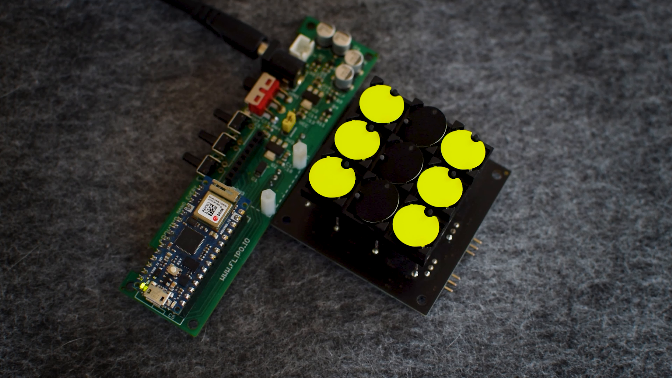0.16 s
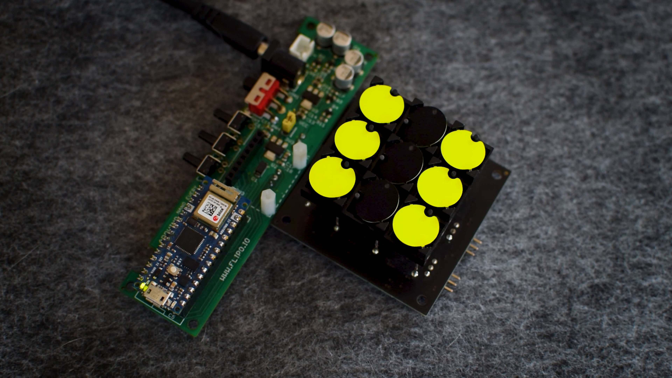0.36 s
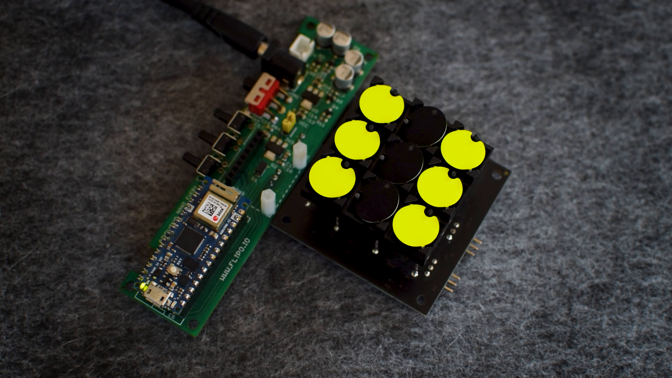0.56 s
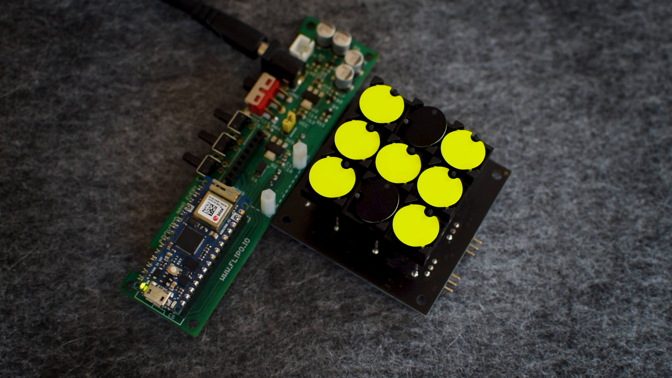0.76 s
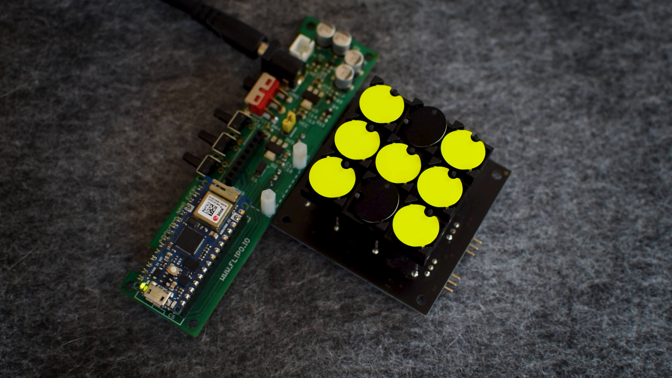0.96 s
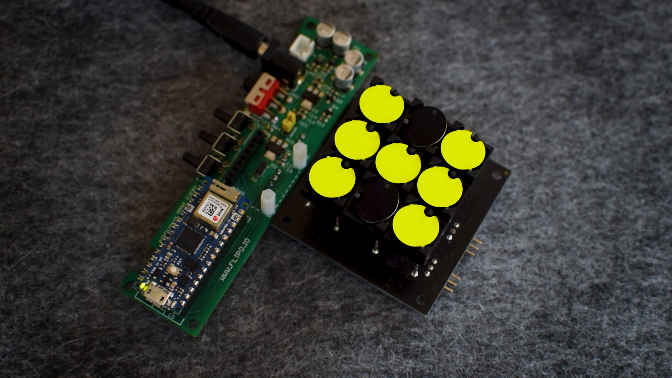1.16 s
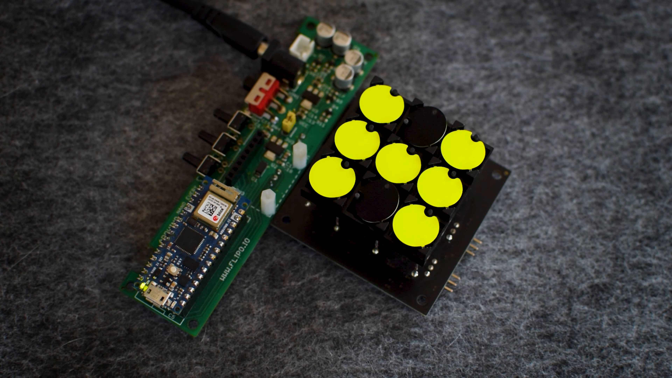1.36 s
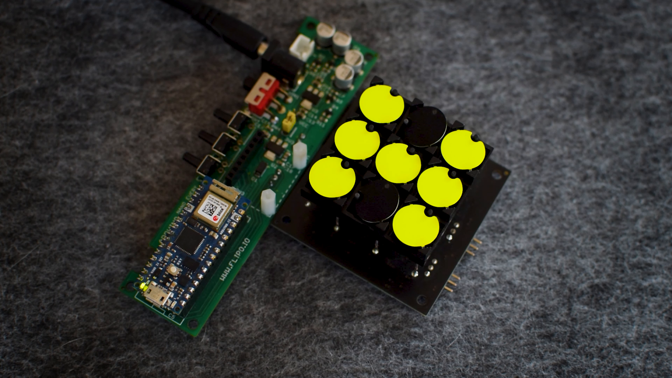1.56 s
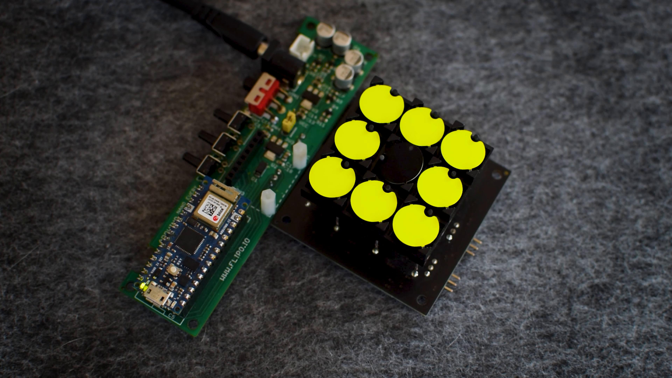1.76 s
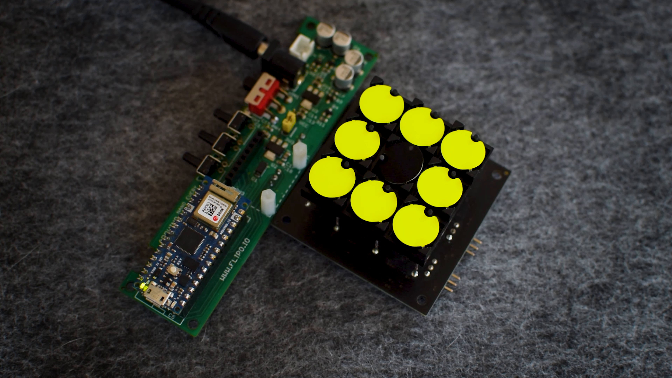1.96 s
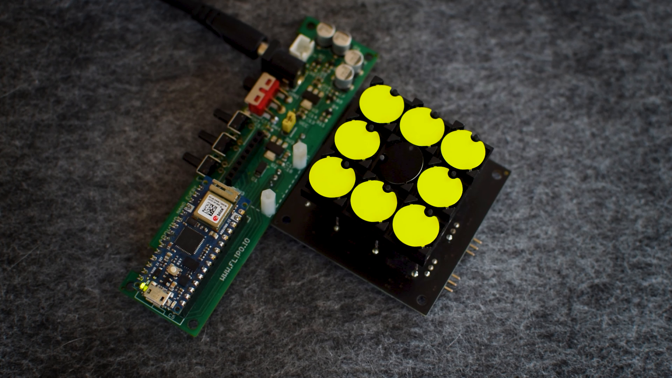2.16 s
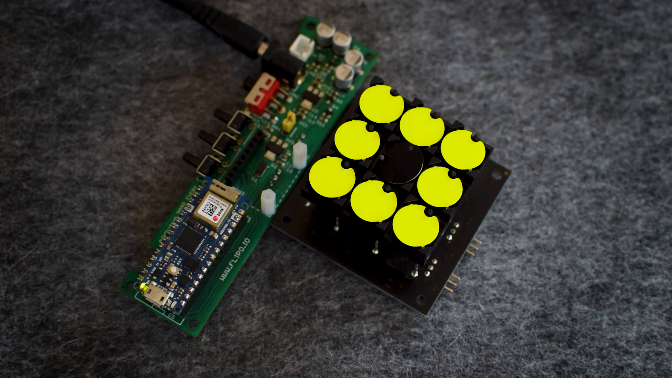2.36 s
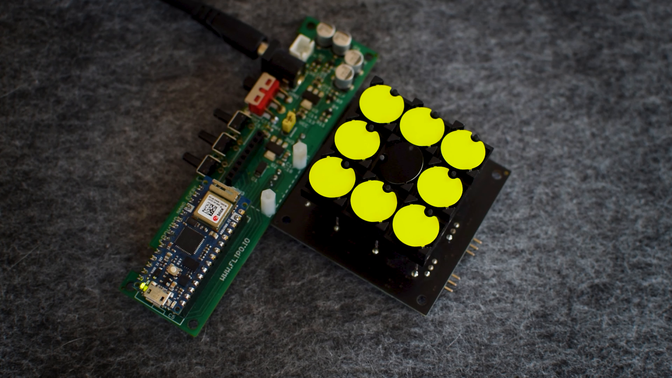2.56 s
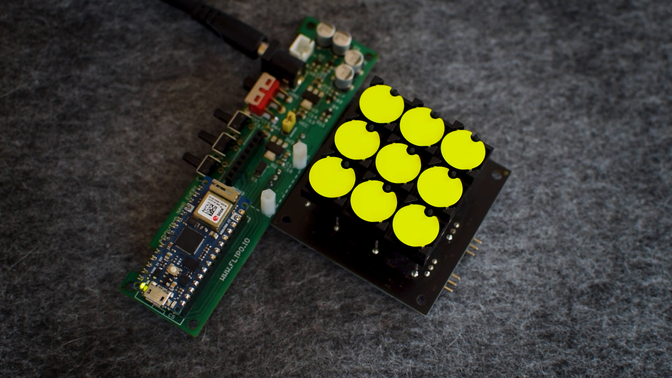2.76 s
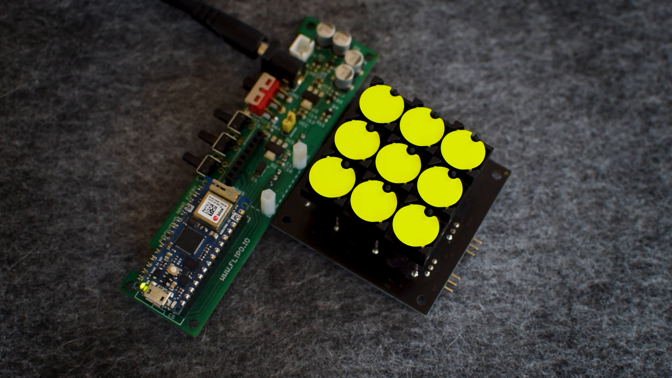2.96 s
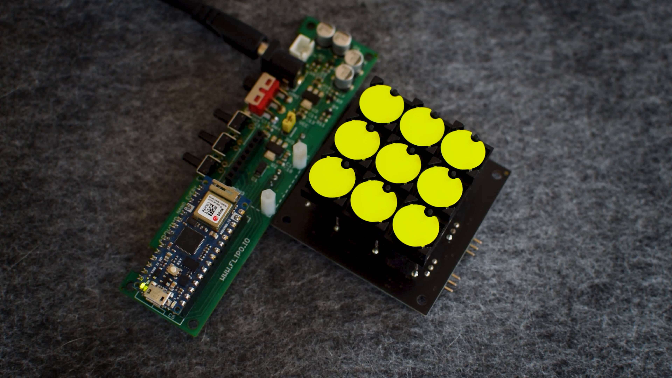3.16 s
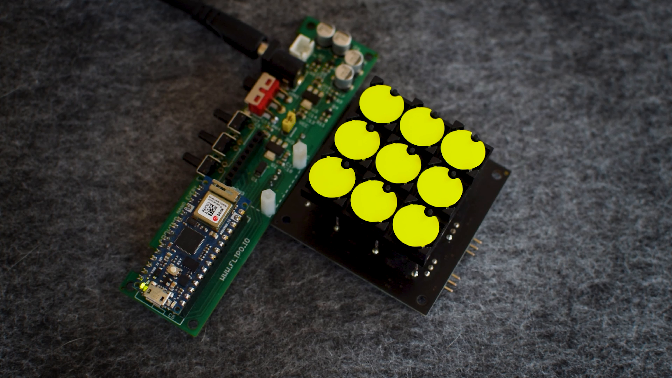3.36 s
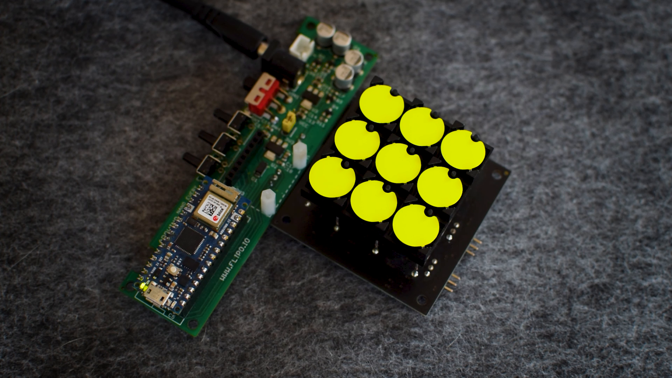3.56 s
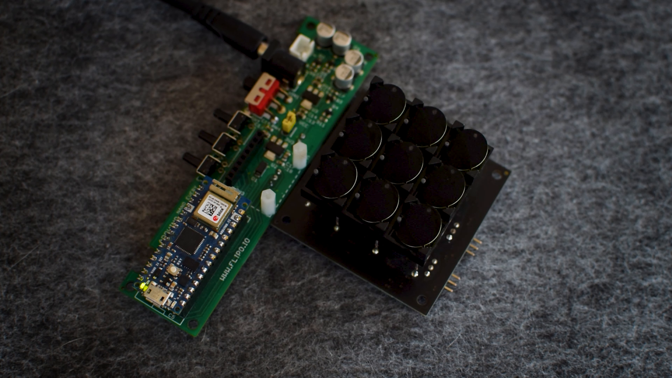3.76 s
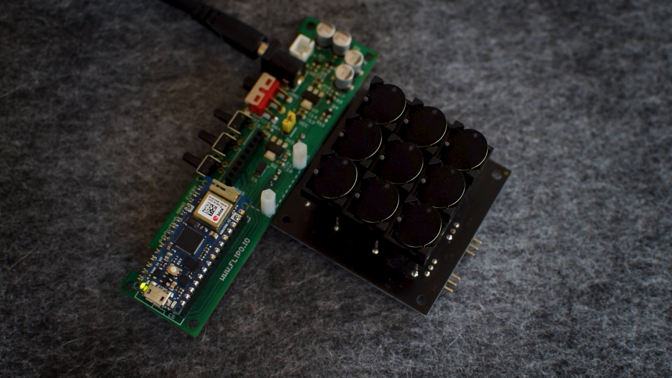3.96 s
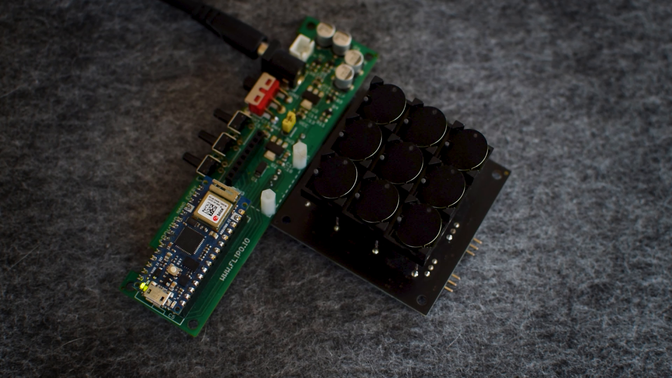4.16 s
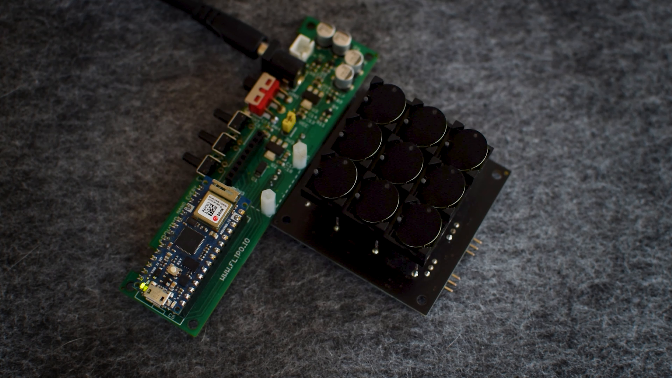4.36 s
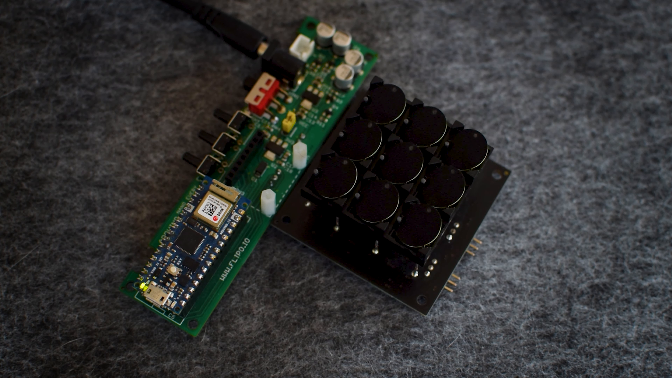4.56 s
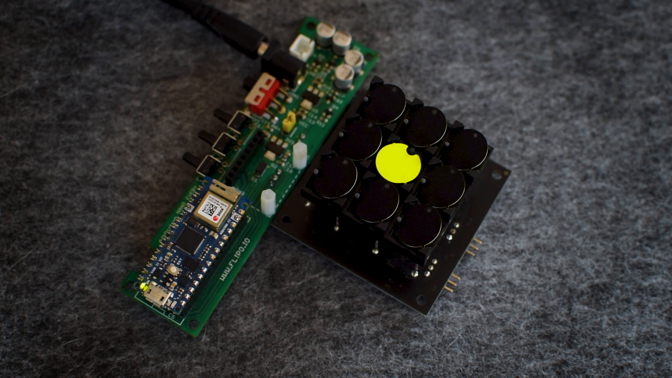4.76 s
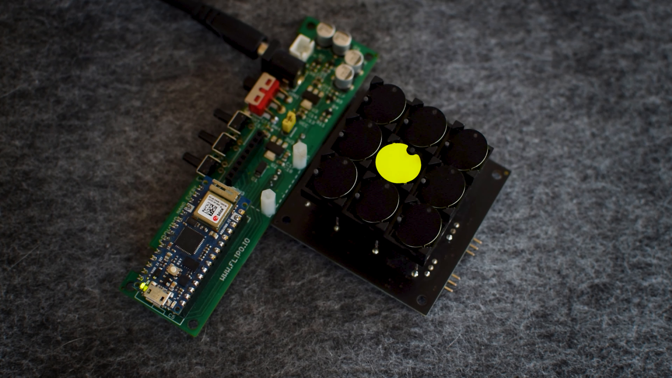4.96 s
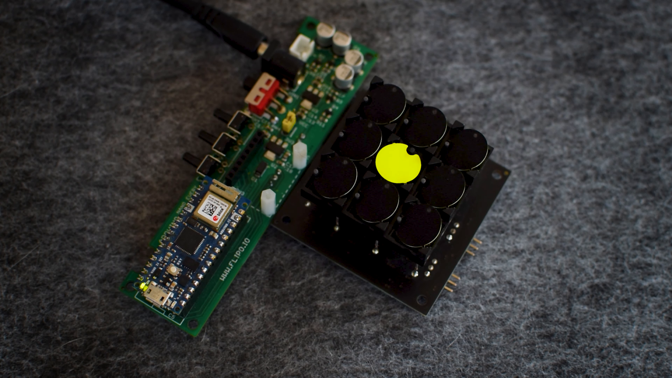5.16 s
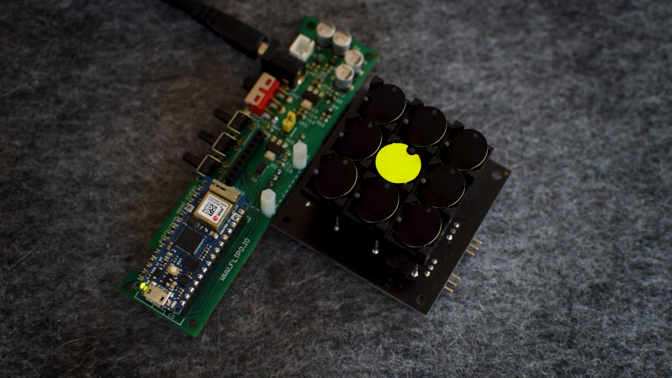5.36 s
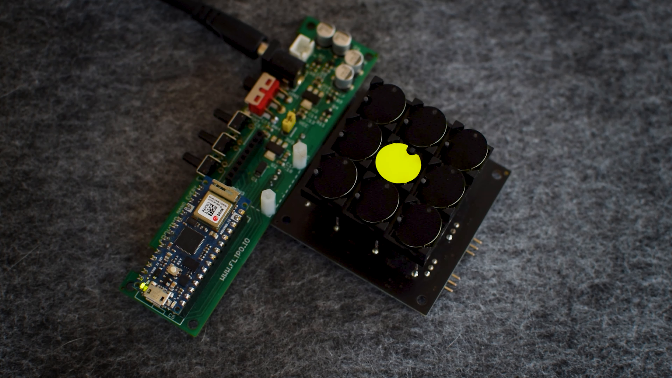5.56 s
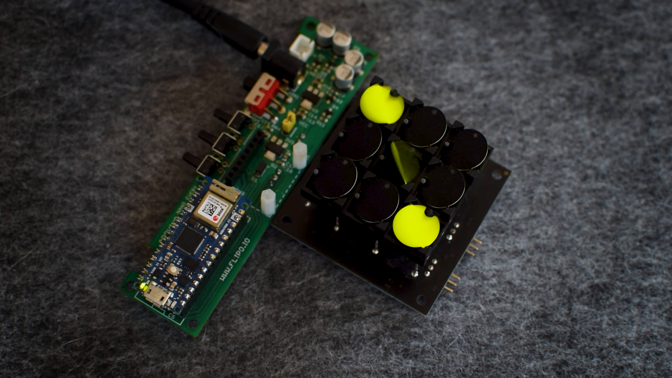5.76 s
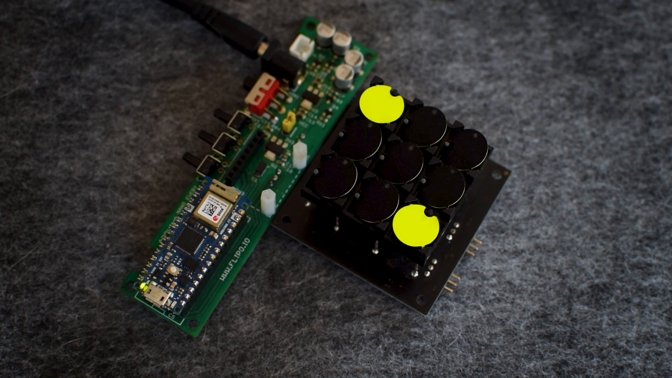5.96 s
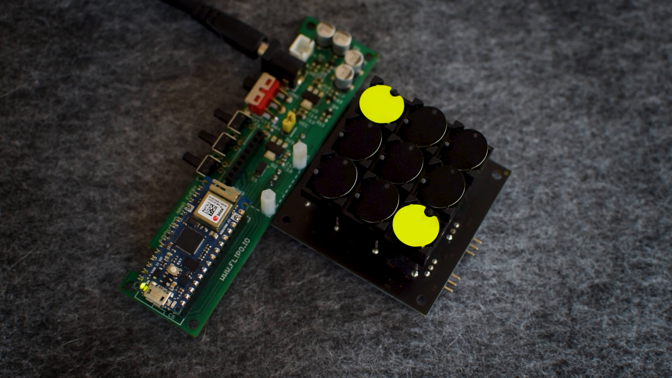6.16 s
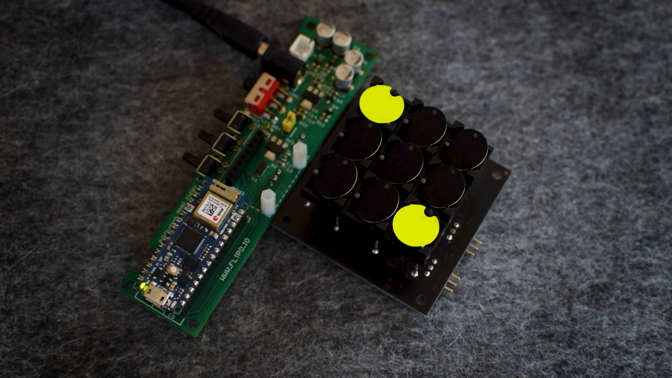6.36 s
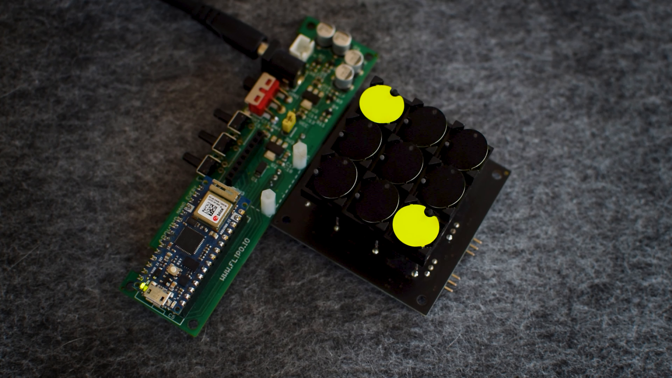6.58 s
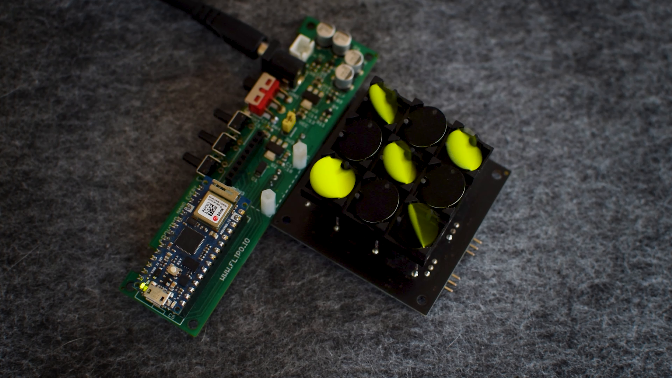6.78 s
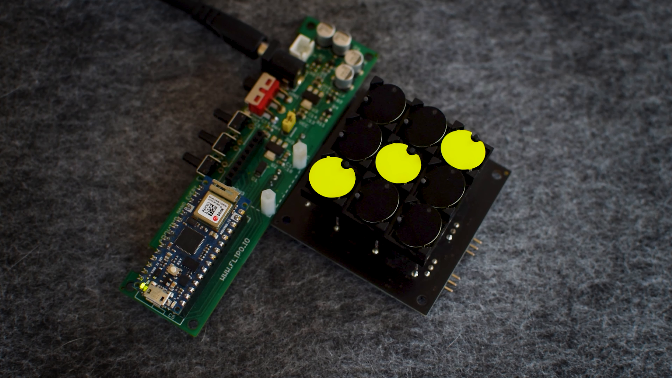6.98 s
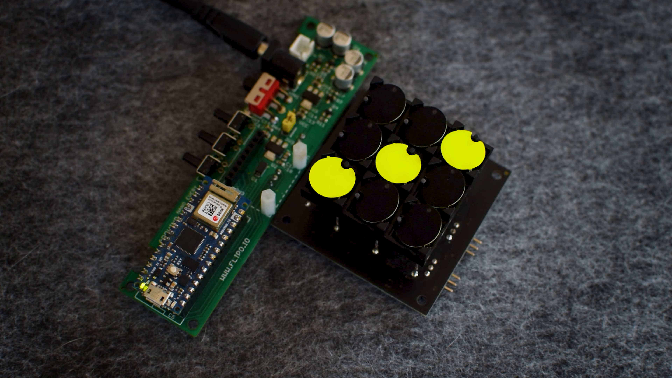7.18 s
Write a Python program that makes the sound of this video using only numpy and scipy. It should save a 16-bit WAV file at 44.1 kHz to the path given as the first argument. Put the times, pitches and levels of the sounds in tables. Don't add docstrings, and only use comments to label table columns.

```python
import sys
import numpy as np
from scipy import signal
from scipy.fft import rfft, irfft, next_fast_len
from scipy.io import wavfile
from scipy.ndimage import uniform_filter1d, map_coordinates

SR = 44100
rng = np.random.default_rng(int(sys.argv[2]) if len(sys.argv) > 2 else 0)


def dump_mix(stems):
    frames = np.atleast_2d(stems).T
    limited = np.clip(frames, -1, 1)
    pcm = np.round(limited * 32767).astype(np.int16)
    wavfile.write(sys.argv[1], SR, pcm)


def linear_from_db(decibels):
    return 10 ** (np.asarray(decibels, float) / 20)


N = 318402


def along(points, hz):
    f, v = np.transpose(points)
    return np.interp(np.log(hz + 1), np.log(f + 1), v)


def level_at(points):
    return lambda hz: linear_from_db(along(points, hz))


def unit(x):
    return x / np.sqrt(np.mean(x ** 2) + 1e-20)


def wander(count, place):
    return map_coordinates(rng.standard_normal(count), [place])


def filtered(x, response):
    m = next_fast_len(x.shape[-1] + 8192)
    return irfft(rfft(x, m) * response(np.fft.rfftfreq(m, 1 / SR)), m)[..., :x.shape[-1]]


def pair(noise, alike, gain):
    def turn(hz):
        return np.arccos(np.clip(along(alike, hz), -1, 1)) / 2

    mid, side = filtered(noise, lambda hz: gain(hz) * [np.cos(turn(hz)), np.sin(turn(hz))])
    return np.array([mid + side, mid - side])


def noise_pair(length, alike, colour):
    return pair(rng.standard_normal((2, length)), alike, level_at(colour))


def add(track, s, sound, db, pan_db):
    track[:, round(s * SR):][:, :sound.shape[1]] += sound * linear_from_db([[db + pan_db / 2], [db - pan_db / 2]])


def ring(modes, scatter_db, detune, apart, attack, extra_db=0):
    hz, level_db, t60 = np.transpose(modes)[:, :, None]
    t = np.arange(int(SR * min(t60.max() * 1.5, 1 / 8))) / SR
    strength, mistuning, start_phase, port_skew = rng.standard_normal((4, len(modes), 1))
    decay = linear_from_db(level_db + extra_db + scatter_db * strength - 60 * t / t60)
    size = decay * (1 - np.exp(-t / attack))
    phase = 2 * np.pi * hz * (1 + detune * mistuning) * t + 2 * start_phase
    skew = apart * port_skew * hz / 8000
    left = (size * np.sin(phase + skew)).sum(0)
    right = (size * np.sin(phase - skew)).sum(0)
    return np.array([left, right])


# hz, level_db [dB per Hz]
DENSE_MODES = [(1200, -37), (2000, -25.5), (2500, -18), (3300, -5.5), (4600, -10.5), (6000, -4.5),
               (8000, 0.5), (11000, -3.5), (13500, -12), (15500, -6), (17000, -30.5)]


def chatter(t60, alike):
    t = np.arange(SR // 8) / SR
    hiss = unit(noise_pair(len(t), [(3000, 1.0), (12000, alike)], DENSE_MODES))
    return hiss * linear_from_db(-60 * t / t60) * (1 - np.exp(-t / 0.000067))


# start_s, level_db (peak), flight_ms (first bounce), bounce_loss_db
LANDINGS = [(0.6854, -6, 20.8, -16), (1.7076, -6, 20.9, -17), (1.7083, -5, 20.2, -17),
            (1.7119, -6, 21.2, -15), (2.7319, -6, 22.7, -21), (3.7549, -8, 25.3, -15),
            (3.7557, -14, 22.5, -16), (3.7574, -7, 24.9, -16), (3.7586, -8, 23.7, -19),
            (3.7596, -5, 24, -22), (3.762, -6, 24.8, -17), (3.7634, -10, 21, -18), (3.7659, -9, 23, -20),
            (3.7688, -8, 23, -22), (4.7827, -6, 22.9, -16), (5.8058, -7, 24.2, -16),
            (5.8071, -4, 24.1, -23), (5.8145, -6, 21.7, -16), (6.8309, -8, 23.2, -18),
            (6.8346, -6, 20.5, -18), (6.8368, -5, 21.8, -20), (6.8388, -13, 17.6, -15),
            (6.8403, -18, 20, -14)]
# mode_hz, level_db, t60_s
DISC_MODES = [(2370, -14, 0.039), (2864, -13.5, 0.035), (3258, -5.5, 0.039), (3600, -7.5, .025),
              (4690, -19, 0.047), (5820, -7.5, 0.033), (6559, -9, 0.018), (7257, -9.5, 0.019),
              (7930, -1.5, .027), (8230, -4, 0.012), (9200, -10, 0.014), (9300, -15, 0.018),
              (11500, -11, 0.013), (13400, -17.5, 0.038), (15200, -21, .02)]
# mode_hz, level_db, t60_s
BOARD_MODES = [(1164, -7.5, 0.046), (1240, -10.5, 0.034), (1398, -1.5, 0.035), (1473, 1.5, 0.045),
               (1735, -2, 0.027)]
# hz, level_db
SNAP_SPECTRUM = [(1000, -51), (2100, -35), (3300, -10.5), (4600, -9.5), (6200, 1), (8000, 0.5), (9500, 0),
                 (11500, -6), (13500, -20), (16000, -16), (18000, -42.5)]
GRAZE_MS, GRAZE_DB = 2.6, -38
REBOUND_MS, REBOUND_DB = 3.2, -14
SECOND_FLIGHT, SECOND_LOSS_DB = .48, -17
LEAN_DB, LEAN_SCATTER_DB = 1.64, 3.04
RING_DB, RING_PER_DOUBLING_DB = -1.5, 1.76
BOARD_DB, BOARD_PER_DOUBLING_DB = -5, 3


def landings():
    out, span, times = np.zeros((2, N + SR)), SR // 2000, np.transpose(LANDINGS)[0]
    pulse = -1.0 * (np.arange(2 * span + 1) == span)
    blow = filtered(pulse, level_at(SNAP_SPECTRUM))
    snap = np.tile(blow * np.hanning(2 * span + 1), (2, 1))
    for s, db, flight_ms, loss_db in LANDINGS:
        doublings = np.log2(np.sum(np.abs(times - s) < 1 / 10))
        ring_db = RING_DB + RING_PER_DOUBLING_DB * doublings
        board_db = BOARD_DB + BOARD_PER_DOUBLING_DB * doublings
        pan_db = LEAN_DB + LEAN_SCATTER_DB * rng.standard_normal()
        second_ms = flight_ms * (1 + SECOND_FLIGHT)
        blow_and_rebound = [(0, 0), (REBOUND_MS, REBOUND_DB)]
        graze_and_bounces = [(-GRAZE_MS, GRAZE_DB), (flight_ms, loss_db),
                             (second_ms, loss_db + SECOND_LOSS_DB)]
        for contacts in (blow_and_rebound, graze_and_bounces):
            disc = linear_from_db(-23.0) * ring(DISC_MODES, scatter_db=4, detune=0.028, apart=0.12, attack=0.0001)
            blur = linear_from_db(-11) * chatter(t60=0.008, alike=0.99) + linear_from_db(-28.5) * chatter(t60=.04, alike=.5)
            board = linear_from_db(-33) * ring(BOARD_MODES, scatter_db=2, detune=0.037, apart=.15, attack=0.0011)
            for ms, step_db in contacts:
                contact_s = s + ms / 1000
                add(out, contact_s - span / SR, snap, db + step_db + 13.0, 0.55 * (pan_db - 3.5))
                for part in (linear_from_db(ring_db) * disc, linear_from_db(ring_db) * blur, linear_from_db(board_db) * board):
                    add(out, contact_s + .0001, part, db + step_db, 0.65 * (pan_db - 1.5))
    return out[:, :N]


# start_s, level_db (peak), frame_mode_hz,
# frame_mode_db
KICKS = [(0.6322, -28, 4060, 2.5), (0.6326, -30.5, 3820, 3), (1.655, -12, 4340, 0),
         (1.6579, -17.5, 4230, 6), (2.679, -18.5, 3820, 2), (2.682, -23, 3660, -3),
         (3.7002, -22, 4020, 12.5), (3.7023, -12, 3924, -1), (3.7034, -18.5, 4015, -1.5),
         (3.7046, -22, 3890, -2), (3.707, -7.5, 3884, 0), (3.71, -13.5, 4030, 1), (3.711, -19, 4238, -1),
         (3.713, -23.5, 4300, -2), (4.733, -15.5, 3970, 5.5), (5.7549, -16, 3920, 2.5),
         (5.7564, -18, 3970, 4.5), (5.7761, -31, 3890, -1), (6.7795, -15.5, 3600, 7.5),
         (6.7842, -12, 4170, 5.5), (6.8067, -29, 3900, 4)]
# mode_hz, level_db, t60_s
CORE_MODES = [(3200, -20, 0.0072), (5100, -15, .02), (5400, -13, .022), (6100, -12, .035),
              (6200, -13.5, .025), (7270, -5, 0.025), (7950, -7.5, 0.035), (9300, 1.5, 0.012),
              (10000, -11.5, .025), (11200, -14.5, .024), (11300, -16, .024), (11250, -13, 0.023),
              (13200, -19, .02), (14890, -10, .02), (15283, -4, 0.024)]
# landing_s, kick_top_modes_db, rattle_db, thump_db, thump_left_right_db
FLIPS = [
    (.686, -0.5, -58, -71, -4),
    (1.71, 1.5, -47.5, -57.5, 3),
    (2.733, 3, -50.5, -75, 4.5),
    (3.76, -1, -35, -55, 7.5),
    (4.783, 8.5, -51, -72, 2.5),
    (5.808, -1.5, -43, -55.5, 4.5),
    (6.834, 3, -42.5, -53.5, -0.5),
]
KICK_BOARD_DB, KICK_BOARD_GROWS = -43.5, 0.26


def kicks():
    out, hz = np.zeros((2, N + SR)), np.transpose(CORE_MODES)[0][:, None]
    for s, db, frame_hz, frame_db in KICKS:
        top_db = min(FLIPS, key=lambda flip: abs(flip[0] - s))[1]
        core = linear_from_db(-11.5) * ring(CORE_MODES, scatter_db=6.5, detune=0.0099, apart=0.3,
                                 attack=0.00023, extra_db=top_db * (hz > 12500))
        modes = [(frame_hz, 0, .012), (frame_hz * .94, -6, .02), (frame_hz * 1.05, -7, .02)]
        frame = ring(modes, scatter_db=2.5, detune=0.0061, apart=0.36, attack=.0004)
        frame *= linear_from_db(frame_db - 12.5)
        blur = linear_from_db(-8.0) * chatter(t60=0.0091, alike=.5) + linear_from_db(-28.5) * chatter(t60=0.037, alike=0.34)
        board = ring(BOARD_MODES, scatter_db=2.0, detune=0.014, apart=.15, attack=0.0023)
        board *= linear_from_db(KICK_BOARD_DB + (KICK_BOARD_GROWS - 1) * db)
        for part in (core, frame, blur, board):
            add(out, s - .0006, part, db, .3)
    return out[:, :N]


# hz, level_db [dB per Hz]
PIVOT_SPECTRUM = [(1500, -18), (2500, -3), (4000, -3.5), (6000, -4.5), (9000, -7), (13000, -10.5),
                  (16000, -16)]


def rattle():
    out, t = np.zeros((2, N + SR)), np.arange(SR // 6) / SR
    for s, _, db, _, _ in FLIPS:
        grains = linear_from_db(3 * wander(300, t * 1500))
        hiss = noise_pair(len(t), [(3000, 0.83), (12000, .5)], PIVOT_SPECTRUM)
        swing = linear_from_db(-60 * t / 0.18) + linear_from_db(1 - 60 * (t - .05) / 0.14) * (t > .05)
        add(out, s - .048, unit(hiss * grains) * swing, db, 0)
    return out[:, :N]


# hz, level_db [dB per Hz]
TABLE_SPECTRUM = [(30, -4.5), (75, 5), (150, -6.5), (300, -4.5), (500, -12), (800, -13), (1100, -26.5),
                  (2000, -59)]
# mode_hz, level_db, t60_s
TABLE_MODES = [(250, -3, .11), (330, -5, .1), (430, -3, .09), (600, -10, .07), (775, -7, .1), (805, -8, .1)]
SHAKE_DB, SHAKE_GROWS = 1.5, 0.38


def thumps():
    out, t = np.zeros((2, N + SR)), np.arange(SR // 8) / SR
    for s, _, _, db, pan_db in FLIPS:
        shake = unit(noise_pair(len(t), [(100, 0.074)], TABLE_SPECTRUM))
        shake *= linear_from_db(SHAKE_DB + SHAKE_GROWS * (db + 55) - 60 * t / 0.1) * (1 - np.exp(-t / 0.0079))
        shake += linear_from_db(1.5) * ring(TABLE_MODES, scatter_db=3.0, detune=0.007, apart=56, attack=0.008)
        add(out, s, shake, db + 9, pan_db)
    return out[:, :N]


# start_s, level_db
SWAYS = [
    (1.709, -50),
    (3.762, -58.5),
    (6.835, -42),
]
# mode_hz, level_db, t60_s
SWAY_MODES = [(50, -2.5, .12), (83, 0, .1), (130, -10.5, .1)]


def table_sway():
    out = np.zeros((2, N + SR))
    for s, db in SWAYS:
        add(out, s, ring(SWAY_MODES, scatter_db=1, detune=.02, apart=40, attack=.006), db, 3)
    return out[:, :N]


# hz, t60_s
ROOM_DECAY = [(800, 0.31), (2000, .22), (4000, .27), (7000, .33), (10000, .27), (16000, .15)]
# hz, level_db
ROOM_TONE = [(800, -7), (2000, -0.5), (4000, -6), (5500, -4.5), (8000, -4), (11000, -5.5), (16000, -5.5)]
# hz, left_right_likeness [-1 to 1]
ROOM_ALIKE = [(1000, 1), (3000, .85), (7000, .4), (15000, .2)]


def room(x):
    out = np.zeros((2, N + 2 * SR))
    for start in range(SR // 4, N, SR):
        hz, t, z = signal.stft(rng.standard_normal((2, SR // 2)), SR, nperseg=256)
        decay = linear_from_db(-60 * t / along(ROOM_DECAY, hz)[:, None])
        tail = signal.istft(z * decay, SR, nperseg=256)[1]
        tail = pair(tail, ROOM_ALIKE, level_at(ROOM_TONE))
        one_flip = x.mean(0)[None, start:start + SR]
        wet = signal.fftconvolve(one_flip, tail / np.linalg.norm(tail[0]), axes=1)
        add(out, start / SR + 0.0033, wet, 0, 1)
    return out[:, :N]


# hz, left_right_db
PORT_LEAN = [(2500, -0.5), (4500, 2.5), (7500, 4), (9000, 2.5), (11000, -0.5), (15000, 0.5)]
# hz, lead_rad
PORT_LEAD = [(2500, 0), (4500, 0), (6000, .6), (9000, .6), (11000, .9), (13000, .3), (15000, 1.4)]


def ports(x):
    side = np.array([[.5], [-.5]])
    return filtered(x, lambda hz: linear_from_db(side * along(PORT_LEAN, hz)) * np.exp(1j * side * along(PORT_LEAD, hz)))


# start_s, pitch_hz, level_db
KNOCKS = [
    (2.08, 850, -67),
    (7.06, 790, -70),
    (7.139, 930, -66),
]


def knocks():
    out = np.zeros((2, N + SR))
    for s, hz, db in KNOCKS:
        modes = [(hz * .8, -3, .07), (hz * .9, -2, .07), (hz, 0, .07), (hz * 1.15, -3, .07)]
        add(out, s, ring(modes, scatter_db=1.5, detune=.04, apart=4, attack=.008), db + 3, 0)
    return out[:, :N]


# centre_s, length_s, level_db
RUSTLES = [
    (.1, .3, -83.5),
    (2.583, 0.11, -80),
    (2.911, .15, -78.5),
    (3.08, .1, -79),
    (4.201, .15, -83.5),
    (4.41, 0.11, -81.5),
    (4.59, 0.11, -80),
    (5.17, .1, -82),
    (7.132, .12, -100.5),
]
# hz, level_db [dB per Hz]
CLOTH_SPECTRUM = [(600, -20), (1200, -3), (2500, 2.5), (4500, -5), (6500, 4), (8000, -19), (10000, -40)]


def rustle():
    t = np.arange(N) / SR
    swell = sum(linear_from_db(db) * np.exp(-((t - s) / length * 2) ** 2) for s, length, db in RUSTLES)
    return swell * unit(noise_pair(N, [(1000, 0.23)], CLOTH_SPECTRUM))


# start_s, end_s, pitch_hz,
# end_pitch_hz, level_db
SQUEALS = [
    (0, 0.13, 1760, 1675, -90),
    (0.19, 0.33, 1780, 1700, -92),
    (0.26, 0.605, 1280, 1268, -89),
    (0.821, 1.555, 1112, 1095, -95),
    (3.289, 3.686, 375, 357, -84),
    (6.882, 7.126, 418, 397.7, -82),
]
# pitch_hz, overtone_db
SQUEAL_OVERTONES = [(1300, -32.5), (1760, -10)]


def squeals():
    out = np.zeros((2, N + SR))
    for start, end, hz, end_hz, db in SQUEALS:
        u = np.linspace(0, 1, round((end - start) * SR))
        waver = linear_from_db(2.5 * wander(40, u * (end - start) * 14))
        phase = 2 * np.pi * np.cumsum(hz + (end_hz - hz) * u) / SR
        overtones = sum(np.sin(k * phase) for k in (2, 3, 4))
        tone = np.sin(phase) + linear_from_db(along(SQUEAL_OVERTONES, hz)) * overtones
        swell = (1 - np.exp(-u * 12)) * (1 - u) ** 0.73
        add(out, start, np.tile(tone * waver * swell, (2, 1)), db + 11.5, 1)
    return out[:, :N]


def mains():
    t = np.arange(N) / SR
    sway = wander(40, t * 3)
    return linear_from_db(-72 + 1.5 * sway) * np.sin(2 * np.pi * 50 * t) * linear_from_db([[2.5], [-2.5]])


# hz, level_db [dB per Hz]
AIR_SPECTRUM = [(12, -32.5), (20, 4), (53, -5.5), (109, -13), (140, -9), (161, -17.5), (196, -12.5),
                (266, -16.5), (371, -16.5), (451, -19.5), (684, -26.5), (831, -25.5), (2600, -35),
                (17000, -40)]
# hz, left_right_likeness [-1 to 1]
AIR_ALIKE = [(60, 0.16), (240, 0.28), (950, -0.11), (3770, 0.25), (15000, -0.049)]
# hz, left_right_db
AIR_LEAN = [(40, 6), (110, -1.5), (250, 1), (700, 0.5), (4000, 0), (15000, 0.4)]
AIR_DB, AIR_DRIFT_DB = -63, 1.07


def air():
    hz, _, z = signal.stft(rng.standard_normal((2, N)), SR, nperseg=1024)
    field = uniform_filter1d(rng.standard_normal(z.shape[1:]), size=3, axis=0)
    patches = unit(uniform_filter1d(field, size=8, axis=1))
    depth_db = along([(60, 0.81), (300, 0.2), (3000, .3)], hz)[:, None]
    noise = signal.istft(z * linear_from_db(depth_db * patches), nperseg=1024)[1][:, :N]
    hum = unit(pair(noise, AIR_ALIKE, level_at(AIR_SPECTRUM)))
    hum = filtered(hum, lambda f: linear_from_db(along(AIR_LEAN, f) / 2 * [[1], [-1]]))
    drift = wander(20, np.arange(N) / SR * 2)
    return hum * linear_from_db(AIR_DB + AIR_DRIFT_DB * drift)


def scene():
    low_cut_hz = 650
    clicks = kicks() + landings() + rattle()
    clicks = filtered(clicks, lambda hz: (1j * hz / (low_cut_hz + 1j * hz)) ** 2)
    board = ports(clicks) + linear_from_db(-27.5) * room(clicks) + thumps() + table_sway()
    return board + knocks() + air() + mains() + rustle() + squeals()


def band_limit(x):
    return signal.sosfilt(signal.butter(12, 17000, fs=SR, output="sos"), x)


# hz, level_db
MIC_TOP = [(15650, 0), (15900, -11), (16800, -16), (17050, -60)]


def record(dry):
    heard = dry / (1 + np.abs(dry / .8) ** 5) ** (1 / 5)
    heard = filtered(heard, level_at(MIC_TOP))
    return band_limit(heard)


dry = scene()
out = record(dry)
dump_mix(out)
```